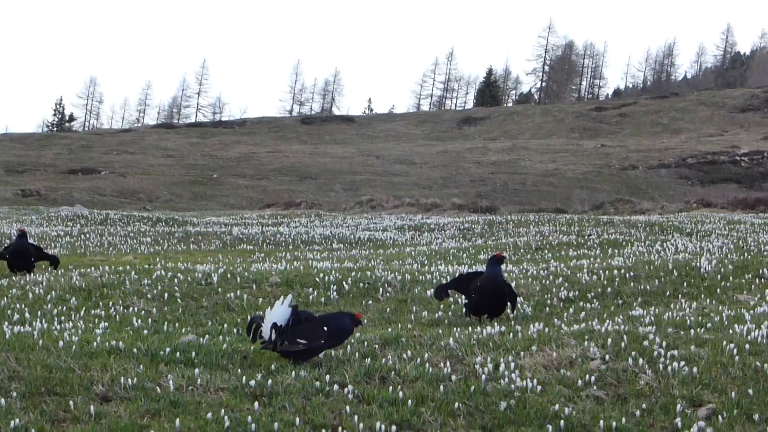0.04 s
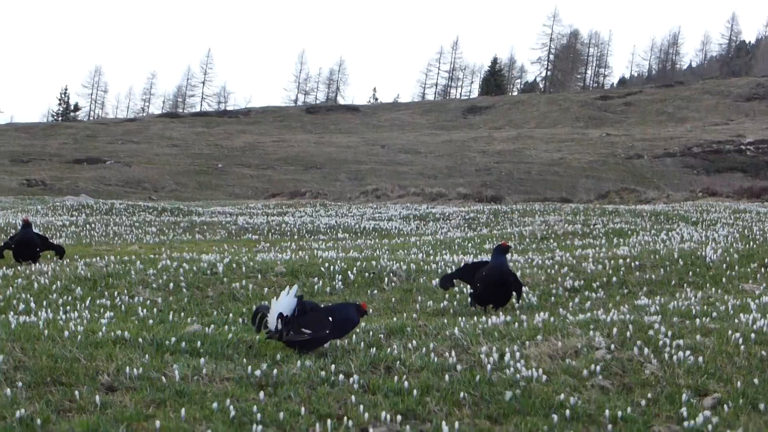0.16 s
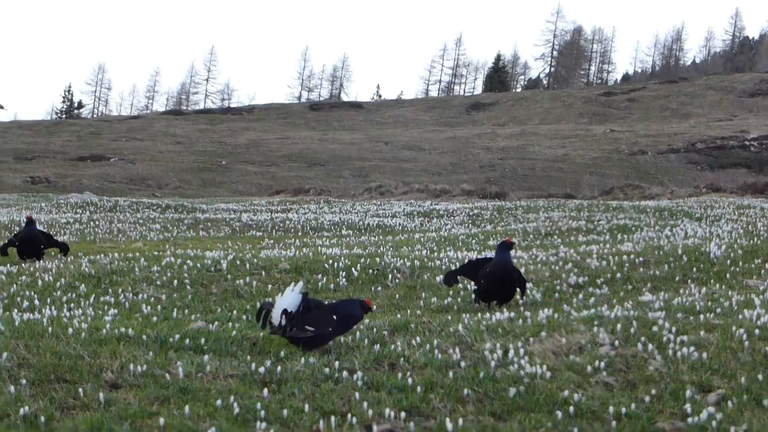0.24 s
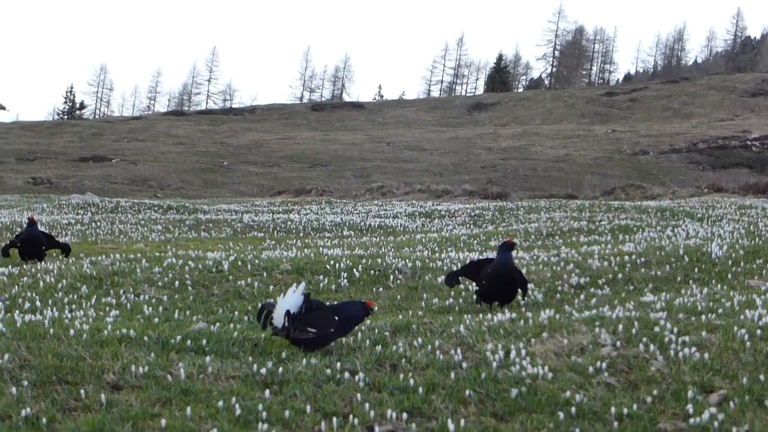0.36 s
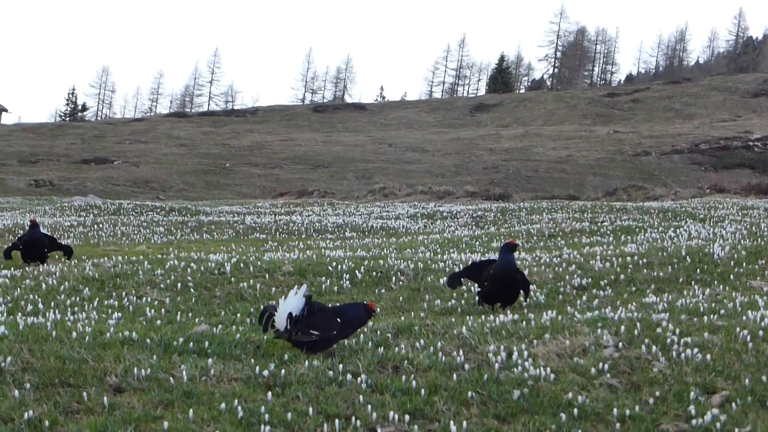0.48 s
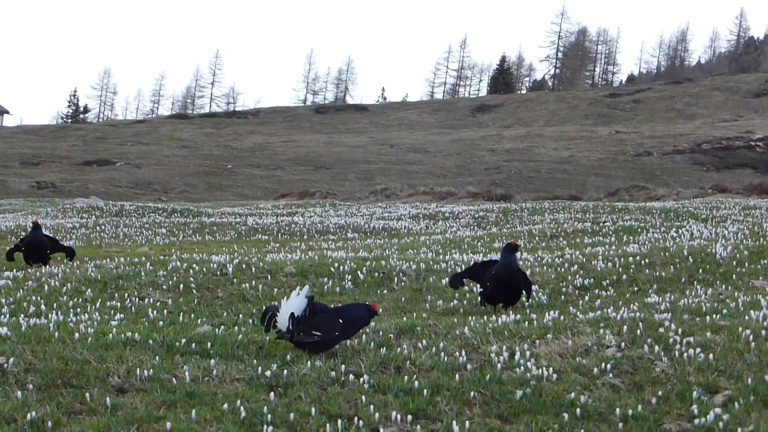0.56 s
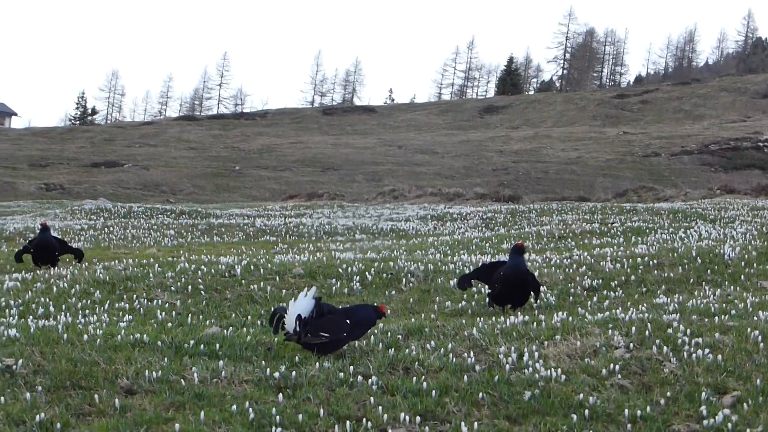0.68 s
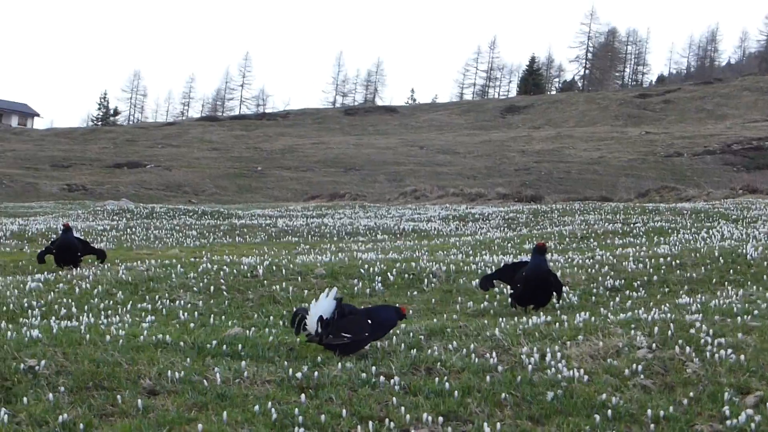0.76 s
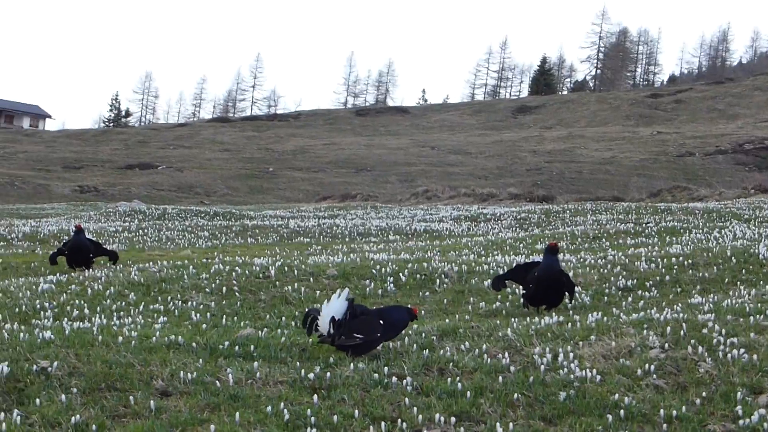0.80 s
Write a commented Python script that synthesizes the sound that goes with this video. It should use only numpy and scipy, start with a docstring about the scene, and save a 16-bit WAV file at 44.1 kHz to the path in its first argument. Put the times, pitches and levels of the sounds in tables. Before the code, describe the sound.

A black grouse coos nearby, then bubbles through a run of short falling notes into more coos. Other males answer faintly across an open mountain meadow, while light wind hisses and a few dry clicks sound close to the microphone.

```python
"""Open mountain meadow, black grouse display. The nearest cock coos, then bubbles up a run of
short falling notes into three more coos: almost pure tones from his swollen throat.
Other cocks answer faintly and the slope returns a thin echo. A few dry clicks sound
close to the microphone; light wind hisses over the grass."""
import sys
import numpy as np
from scipy import signal
from scipy.fft import rfft, irfft, next_fast_len
from scipy.io import wavfile
from scipy.ndimage import uniform_filter1d, map_coordinates

SR = 44100
rng = np.random.default_rng(int(sys.argv[2]) if len(sys.argv) > 2 else 0)


def master_out(mix):
    """Clip the mix to full scale and print it as 16-bit PCM to the path in sys.argv[1]."""
    frames = np.transpose(np.atleast_2d(mix))
    ceiling = np.clip(frames, -1, 1)
    pcm = np.round(ceiling * 32767).astype(np.int16)
    wavfile.write(sys.argv[1], SR, pcm)


N = 81585

# Near cock, one contour per coo: t/s, f/Hz, level/dB
COO_CONTOURS = [
    [(0.122, 518, -42), (0.127, 510, -26), (0.132, 501, -21), (0.146, 512, -18), (0.154, 537, -18),
     (0.16, 572, -25), (0.192, 562, -24), (0.2, 517, -19), (0.206, 540, -24), (0.22, 520, -19),
     (0.235, 543, -30)],
    [(0.235, 541, -32), (0.24, 522, -24), (0.244, 527, -22), (0.266, 518, -24), (0.3, 579, -34),
     (0.336, 497, -18), (0.347, 475, -34), (0.362, 490, -43)],
    [(0.742, 420, -41), (0.758, 420, -37), (0.774, 440, -29), (0.784, 448, -25), (0.792, 450, -35),
     (0.8, 480, -46)],
    [(1.413, 525, -42), (1.418, 529, -26), (1.423, 538, -23), (1.432, 585, -29), (1.465, 517, -18),
     (1.471, 505, -21), (1.482, 520, -38)],
    [(1.482, 585, -36), (1.487, 600, -27), (1.493, 628, -33), (1.51, 618, -30), (1.532, 518, -17),
     (1.54, 510, -23), (1.55, 529, -37)],
    [(1.55, 600, -40), (1.555, 630, -34), (1.563, 650, -38), (1.574, 589, -26), (1.585, 518, -18),
     (1.588, 516, -19), (1.614, 539, -47)],
]
# Near cock, bubbling run: t/s, length/s, first f/Hz, middle f/Hz, last f/Hz, level/dB, tilt/dB
BUBBLE_NOTES = [(0.799, 0.056, 550, 419, 358, -32, -22), (0.864, 0.06, 465, 403, 400, -37, -14),
                (0.927, .060, 455, 420, 378, -34.5, -7.5), (0.996, .062, 472, 430, 377, -32.5, -15.5),
                (1.064, 0.059, 490, 439, 400, -30.5, -9.5), (1.133, 0.055, 485, 437, 384, -31, -9),
                (1.205, 0.055, 465, 438, 374, -30.5, -5), (1.274, 0.053, 498, 465, 400, -24, -5.5),
                (1.342, 0.052, 468, 497.6, 424, -22, 9.5), (1.387, 0.028, 490, 447, 436, -30.5, -13.5)]
# Far cocks: t/s, length/s, first f/Hz, middle f/Hz, last f/Hz, level/dB
FAR_NOTES = [(0.182, .055, 461.7, 438, 420, -40), (0.451, 0.085, 1023, 1040, 1020, -54),
             (.595, 0.03, 346.6, 315, 305, -46), (.69, 0.048, 400, 415, 400, -45),
             (1.012, 0.042, 1040, 990, 950, -47.5), (1.316, 0.04, 440, 413, 426, -38),
             (1.411, 0.05, 470, 433, 420, -39.5), (1.489, 0.047, 450, 415, 400, -41.5),
             (1.562, .03, 480, 460, 440, -39.5), (1.703, 0.022, 576, 550, 520, -39.5),
             (1.788, 0.022, 472.3, 482, 513, -32), (1.80, 0.021, 630, 784, 746, -41),
             (1.807, 0.033, 577, 509, 479, -39.5)]
# Dry clicks: t/s, level before colouring/dB, tail re snap/dB, resonance f/Hz, resonance gain/dB
CLICKS = [(0.595, -46, -2, 4100, 1), (0.604, -38.5, -17.5, 4150, 18), (0.7544, -20.5, -17.5, 2256, 8.5),
          (.785, -37, -10, 2900, 1), (1.261, -39, -21.5, 2900, 16), (1.5818, -43, -22, 2900, 14),
          (1.79, -50, -1.5, 3700, 15)]
# Click colour: f/Hz, gain/dB
CLICK_COLOUR = [(100, -52), (500, -13.5), (1200, 7.5), (2700, 4), (3700, -7.5), (6200, -3.5), (8500, -8.5),
                (10400, -4.5), (13000, -17.5), (15500, -15)]
# Click stereo image: f/Hz, left-right correlation
CLICK_CORRELATION = [(700, 0.79), (1200, -.1), (2300, -0.62), (3400, 0.37), (4300, 0.96), (10000, 0.58),
                     (15000, .6)]
# Moving air spectrum: f/Hz, relative density/dB
AIR_SPECTRUM = [(15, -57), (25, -43), (80, -25.5), (130, -9.5), (189, -7.5), (299, -7), (382, -4.5),
                (557, -3.5), (749, -6), (1040, -4.5), (1320, -8), (2030, -14), (3390, -26), (8270, -28),
                (8970, -29.5), (12400, -31.5), (15800, -36)]
# Air stereo image: f/Hz, left-right correlation
AIR_CORRELATION = [(60, .9), (200, 0.98), (600, 0.87), (1300, 0.17), (3000, 0.25), (7000, 0.28),
                   (15000, 0.74)]
# Grass hiss envelope: t/s, level/dB
GRASS_ENVELOPE = [(.12, -62.5), (.3, -59.5), (.36, -61), (.42, -91), (.52, -65), (.6, -62), (.65, -63),
                  (.86, -63), (.95, -67.5), (1.7, -83.5), (1.85, -56.5)]
# Grass hiss spectrum: f/Hz, relative density/dB
GRASS_SPECTRUM = [(500, -40), (2500, 2.5), (6000, -6.5), (11000, -4.5), (15500, -18)]


def throat_tone(f_hz, level_db, waver=.005, flutter_db=.4, second_harmonic_db=-49):
    """Tone wavering in pitch and level; the throat all but swallows its overtone."""
    wavering_hz = f_hz * (1 + waver * wobble(150))
    phase_rad = 2 * np.pi * np.cumsum(wavering_hz) / SR
    peak = np.sqrt(2) * amp(level_db + flutter_db * wobble(120))
    return peak * (np.sin(phase_rad) + amp(second_harmonic_db) * np.sin(2 * phase_rad))


def coo(contour, edge_s=.005, glide_s=.003):
    """Drawn-out note, loudest where the pitch sinks onto the throat's resonance; turns are rounded."""
    t_s = clock()
    knots_s, f_hz, level_db = np.transpose(contour)
    glide = lambda values: uniform_filter1d(np.interp(t_s, knots_s, values), int(glide_s * SR))
    gate = ease((t_s - knots_s[0]) / edge_s + .5) * ease((knots_s[-1] - t_s) / edge_s + .5)
    return gate * throat_tone(glide(f_hz), glide(level_db))


def bubble(start_s, length_s, first_hz, middle_hz, last_hz, level_db, tilt_db=0):
    """Short note: the pitch bends through three points while the breath opens and closes."""
    attack_s, release_s = .0159, .019
    t_s = clock() - start_s
    progress = np.clip(t_s / length_s, 0, 1)
    bend = np.polyfit([0, .5, 1], [first_hz, middle_hz, last_hz], 2)
    breath = ease(t_s / attack_s) * ease((length_s - t_s) / release_s)
    return breath * throat_tone(np.polyval(bend, progress), level_db + tilt_db * (progress - .5))


def slope_echo(calls, gain_db=-29, t60_s=.8, build_s=.06):
    """The hillside scatters a thin late answer."""
    t_s = np.arange(SR) / SR
    tail = rng.standard_normal((2, SR)) * ease(t_s / build_s) * amp(-60 * t_s / t60_s)
    tail /= np.linalg.norm(tail[0])
    return amp(gain_db) * signal.fftconvolve(calls[None], tail, axes=1)[:, :N]


def clicks(snap_t60_s=.011, tail_t60_s=.16, ring_width_hz=360):
    """Brief snaps, each with one short resonance and a rustling tail."""
    out = np.zeros((2, N))
    for start_s, level_db, tail_db, ring_hz, ring_db in CLICKS:
        t_s = np.maximum(clock() - start_s, 0)
        snap = amp(-60 * t_s / snap_t60_s)
        tail = amp(tail_db - 60 * t_s / tail_t60_s)
        burst = (t_s > 0) * (snap + tail) * stereo_noise([(1000, 0)], CLICK_CORRELATION)  # white
        ring = lambda f_hz: 1 + (amp(ring_db) - 1) / (1 + 2j * (f_hz - ring_hz) / ring_width_hz)
        body = lambda f_hz: amp(log_interp(CLICK_COLOUR, f_hz)) * ring(f_hz)
        out += amp(level_db) * filtered(burst, body)
    return out


def wind(air_db=-46, air_flutter_db=.23, grass_flutter_db=2.6):
    """Soft wash of moving air plus a finer hiss from the grass."""
    air = amp(air_db + air_flutter_db * wobble(14.8)) * stereo_noise(AIR_SPECTRUM, AIR_CORRELATION)
    grass_db = np.interp(clock(), *np.transpose(GRASS_ENVELOPE)) + grass_flutter_db * wobble(60)
    return air + amp(grass_db) * stereo_noise(GRASS_SPECTRUM, correlation=[(5000, .5)])


def stereo_noise(spectrum, correlation):
    """Coloured noise, rms 1; the mid/side balance sets the left-right correlation."""
    def mid_side_gains(f_hz):
        angle_rad = np.arccos(np.clip(log_interp(correlation, f_hz), -1, 1)) / 2
        return amp(log_interp(spectrum, f_hz)) * [np.cos(angle_rad), np.sin(angle_rad)]

    mid, side = filtered(rng.standard_normal((2, N)), mid_side_gains)
    noise = np.array([mid + side, mid - side])
    return noise / np.sqrt(np.mean(noise ** 2) + 1e-20)


def filtered(x, response):
    """Apply response(f_hz) by zero-padded FFT."""
    n_fft = next_fast_len(N + SR // 2)
    f_hz = np.fft.rfftfreq(n_fft, 1 / SR)
    return irfft(rfft(x, n_fft) * response(f_hz), n_fft)[..., :N]


def wobble(rate_hz):
    """Smooth curve through random knots."""
    knots = rng.standard_normal(int(N * rate_hz / SR) + 4)
    return map_coordinates(knots, [clock() * rate_hz])


def log_interp(points, f_hz):
    """Interpolate (f/Hz, value) points on a log frequency axis."""
    knots_hz, values = np.transpose(points)
    return np.interp(np.log(f_hz + 1), np.log(knots_hz + 1), values)


def ease(progress):
    """Smooth step, 0 to 1."""
    return np.sin(np.pi / 2 * np.clip(progress, 0, 1)) ** 2


def amp(level_db):
    """dB to gain."""
    return 10 ** (np.asarray(level_db) / 20)


def clock():
    """Sample times, t/s."""
    return np.arange(N) / SR


def scene(pan_db=.9):
    """Cocks slightly right of centre, their echo, clicks, wind."""
    coos = sum(coo(contour) for contour in COO_CONTOURS)
    bubbling = sum(bubble(*note) for note in BUBBLE_NOTES)
    far_cocks = sum(bubble(*note) for note in FAR_NOTES)
    calls = coos + bubbling + far_cocks
    return calls * amp([[-pan_db], [pan_db]]) + slope_echo(calls) + clicks() + wind()


def record(dry, open_s=.115, top_hz=15800):
    """The microphone opens after a moment; narrow treble notch, band limit."""
    notch_hz, notch_width_hz, notch_db = 9080, 230, -10
    notch = lambda f_hz: amp(notch_db * np.exp(-((f_hz - notch_hz) / notch_width_hz) ** 2))
    lowpass = lambda f_hz: ease((top_hz - f_hz) / 200 + .5)  # 200 Hz edge
    return filtered(dry * (clock() > open_s), lambda f_hz: notch(f_hz) * lowpass(f_hz))


dry = scene()
out = record(dry)
master_out(out)
```